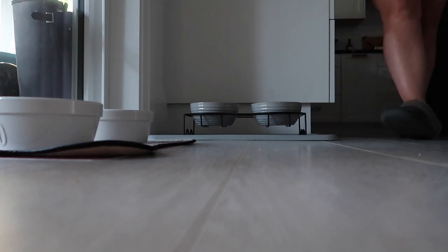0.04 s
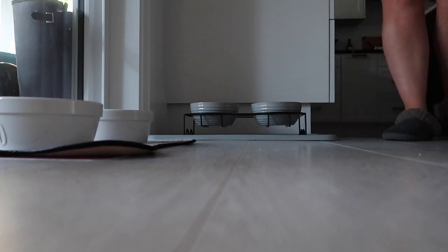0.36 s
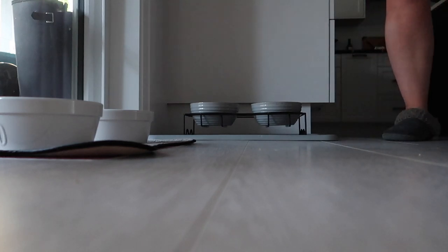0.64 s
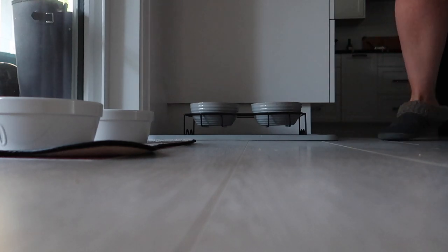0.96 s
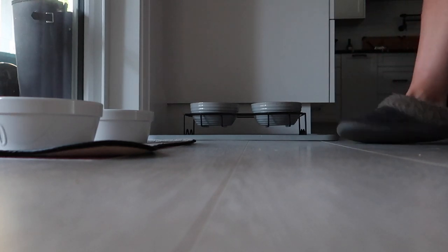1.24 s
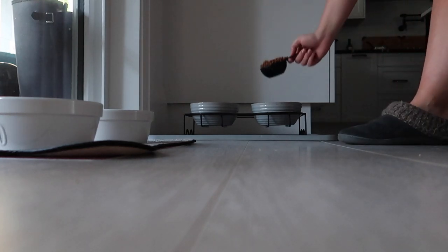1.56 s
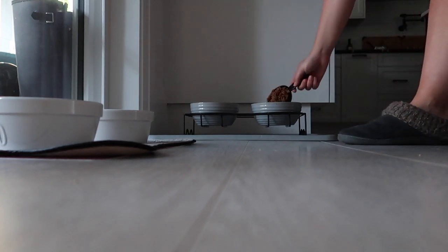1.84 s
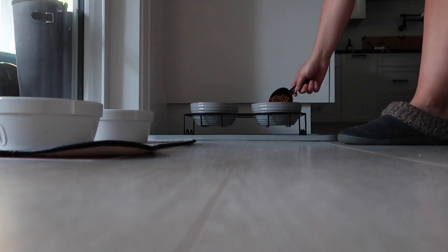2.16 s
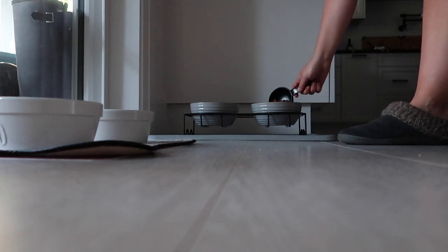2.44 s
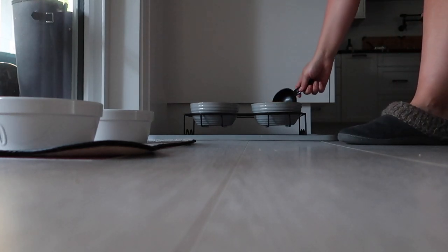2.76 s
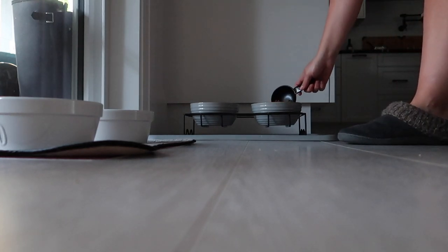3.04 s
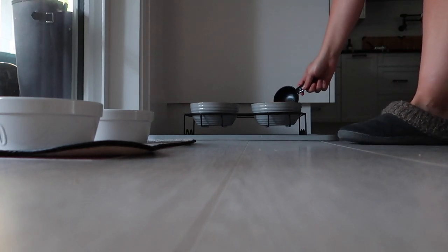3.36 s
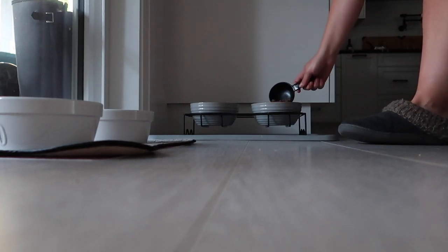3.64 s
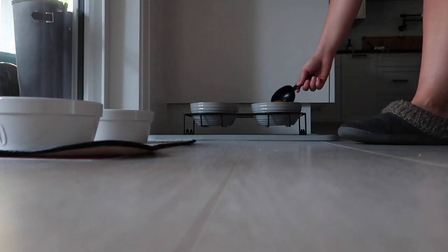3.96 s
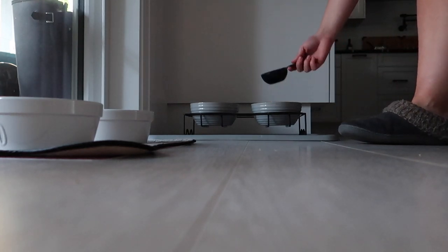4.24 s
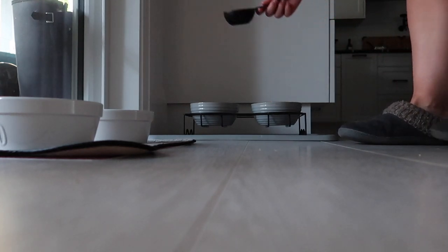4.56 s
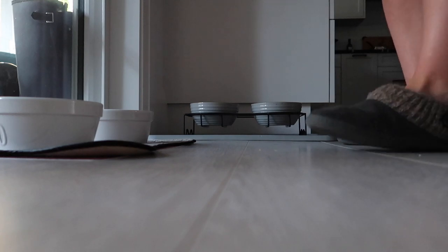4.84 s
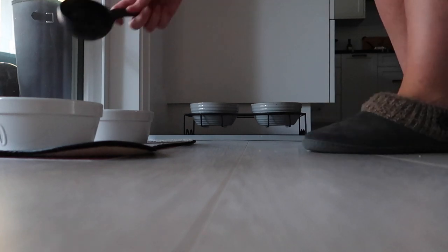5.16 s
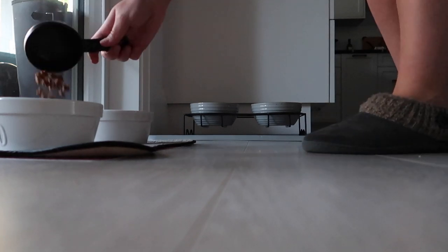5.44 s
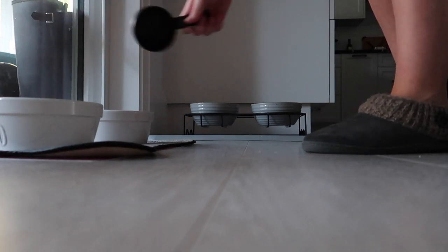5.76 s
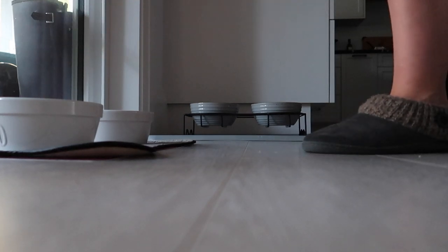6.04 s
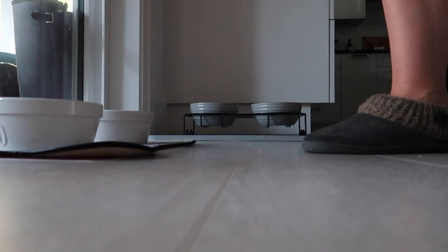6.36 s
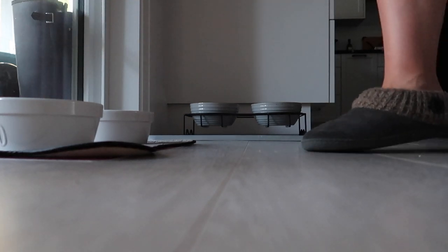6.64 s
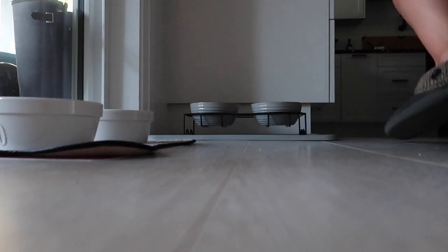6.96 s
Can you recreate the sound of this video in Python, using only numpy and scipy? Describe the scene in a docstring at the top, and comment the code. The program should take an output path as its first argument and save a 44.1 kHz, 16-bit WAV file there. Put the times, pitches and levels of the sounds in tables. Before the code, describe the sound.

Slippers shuffle on kitchen tile as kibble pours into a ceramic bowl, a scoop knocks, and more pellets clatter into a duller dish.

```python
"""Dry dog food pours from a plastic scoop into a ceramic bowl: pellets rattle on the glaze and ring
the wall until the heap damps it. The scoop knocks on the rim, last pieces tick in its cup, and a
shorter pour lands in a duller dish. Slippers slap and shuffle, clothes swish and joints crack as the
person bends and rises. A tiled kitchen reverberates, over room noise and appliance hum."""
import sys
import numpy as np
from scipy import signal
from scipy.fft import rfft, irfft, next_fast_len
from scipy.io import wavfile
from scipy.ndimage import uniform_filter1d

SR = 44100
rng = np.random.default_rng(int(sys.argv[2]) if len(sys.argv) > 2 else 0)


def unload_wav(signal):
    """Save mono or channel-first audio to the path in sys.argv[1] as 16-bit WAV at rate SR, clipped to [-1, 1]."""
    wavfile.write(
        sys.argv[1],
        SR,
        np.round(np.clip(np.atleast_2d(signal).T, -1, 1) * 32767).astype(np.int16),
    )


N = 317230
T = np.arange(N) / SR
SIDE = np.array([[1], [-1]])   # left plus, right minus

POUR_START_S, POUR_RISE_S, POUR_HOLD_S, POUR_DB = 1.913, 0.0097, 0.31, -37.5
PELLETS_PER_S, HEAP_AT_S, HEAP_BUILD_S = 850, 2.09, 0.021
def first_pour():
    """Kibble showers the bowl: the bulk stops fast, a trickle lingers, a shake frees the last pieces."""
    def pour(db, fall_db_per_s, hold_s=POUR_HOLD_S):
        return envelope(POUR_START_S, db, POUR_RISE_S, fall_db_per_s, hold_s)

    bulk = pour(POUR_DB, fall_db_per_s=80)
    trickle = pour(-42, fall_db_per_s=40)
    dribble = envelope(start_s=2.9, db=-56.5, rise_s=0.017, fall_db_per_s=70)
    flow = power_sum([bulk, trickle, dribble]) / from_db(POUR_DB)
    heap = .5 + .5 * np.tanh((T - HEAP_AT_S) / HEAP_BUILD_S)
    bare_glaze = pour(-36, fall_db_per_s=30.5, hold_s=0.091)   # first pellets click hardest
    rattle = pellet_rattle(flow) * np.hypot(bare_glaze, dribble)
    ring = bowl_ring(flow, heap)
    shimmer_gain = from_db(-5.5) * power_sum([bulk, pour(-42, fall_db_per_s=42), dribble])
    shimmer = kitchen(shimmer_gain * bowl_shimmer(heap), wet_db=-12, early_db=-15)
    shimmer += from_db(-4) * shimmer_gain * bowl_shimmer(heap) * SIDE
    return kitchen(rattle, wet_db=-8.5, early_db=-5.5) + shimmer + ring


# kibble on glaze: freq_hz, gain_db
RATTLE_SPECTRUM = [(300, -17), (700, 0), (930, 3), (1300, 0), (1800, -3), (2600, 0), (3300, 5.5),
                   (3650, 13.5), (4000, 19), (4350, 10), (4700, 10), (5300, -1), (6200, -3), (7000, 8),
                   (7700, 1), (8600, -1), (11000, 2.5), (13000, -3), (14300, -8)]
def pellet_rattle(flow):
    """Rough pellets hit the glaze, more often at higher flow."""
    shower = grains(per_s=PELLETS_PER_S * np.sqrt(flow), spread_db=3.9)
    impacts = through(shower, crunch(decay_s=0.0004))
    return evened(through(impacts, contact(RATTLE_SPECTRUM)), span_s=0.04)


# bowl wall modes: pitch_hz, relative_db
WALL_MODES = [(3884, -19), (3960, -8), (3976, -8), (4003, -4), (4023, 3), (4043, 2), (4162, -13),
              (4290, -21), (4325, -22)]
# clumps landing, levels relative: start_s, landing_s, wall_db, upper_db
CLUMP_HITS = [(1.916, 0.0064, -25, -53), (1.936, 0.0042, -20, -33), (1.966, 0.016, -26, -38),
              (1.987, 0.012, -20, -34.5), (2.012, 0.0042, -26, -35), (2.031, 0.0033, -25, -36),
              (2.049, 0.015, -19, -51), (2.084, 0.004, -25, -58), (2.093, 0.017, -19, -48),
              (2.145, 0.018, -23, -33), (2.183, .008, -27, -48), (2.202, 0.01, -21, -34),
              (2.217, 0.011, -32, -29.5), (2.235, 0.036, -27.5, -44), (2.284, 0.02, -28.5, -44),
              (2.314, 0.011, -30.5, -45), (2.347, 0.014, -62, -40.5), (2.42, .004, -50, -54),
              (2.447, .012, -47, -54), (2.494, 0.0036, -46, -65), (2.538, 0.005, -44, -51),
              (2.567, .006, -44, -49), (2.901, 0.0029, -49, -70), (2.917, 0.003, -43, -54),
              (2.948, .003, -56, -62), (3.129, 0.0017, -57, -81)]
# rim under first pellets, bulk and stragglers: start_s, relative_db, rise_s, fall_db_per_s, hold_s
RIM_SURGES = [(1.915, -56, .03, 75, .18), (2.09, -51.5, .04, 75, .15), (2.59, -58.5, .04, 100, .11)]
WALL_HZ, UPPER_HZ, RIM_HZ, HEAP_DAMPING_DB = 4025, 6905, 3090, 11
def bowl_ring(flow, heap):
    """Close wall modes beat; clumps swell the ring and the heap damps the stream's share of it."""
    def clumps(column):
        return power_sum(envelope(row[0], row[column], rise_s=0.004, fall_db_per_s=1300, hold_s=row[1])
                         for row in CLUMP_HITS)

    wall = evened(sum(from_db(db) * driven_mode(hz, t60_s=0.82) for hz, db in WALL_MODES), span_s=.007)
    wall = from_db(-1.2) * resonate(wall, WALL_HZ, width_hz=320)
    wall = wall + from_db(-15) * driven_mode(WALL_HZ, t60_s=.02) * SIDE
    upper = resonate(driven_mode(UPPER_HZ, t60_s=.08, span_s=.005), UPPER_HZ, width_hz=260)
    upper = upper + from_db(-9) * driven_mode(UPPER_HZ, t60_s=.04) * SIDE
    rim = resonate(driven_mode(RIM_HZ, t60_s=0.76, span_s=.04), RIM_HZ, width_hz=60)
    rim *= power_sum(envelope(*row) for row in RIM_SURGES)
    stream = flow ** 0.7 * from_db(POUR_DB - 3.5 - HEAP_DAMPING_DB * heap) * lumps(spread_db=3)
    ring = rim + np.hypot(clumps(column=2), stream) * wall + clumps(column=3) * upper
    return kitchen(ring, wet_db=-18, early_db=-22)


# other bowl modes: pitch_hz, relative_db, t60_s
SHIMMER_MODES = [(895, -12, 0.034), (1291, -15, 0.21), (6907, -2, .05), (6980, -7, 0.04), (9523, -7, 0.09),
                 (10385, -3, 0.2), (12020, -4, 0.06), (13447, -13, .05), (13800, -9, 0.055),
                 (14260, -14, .08)]
def bowl_shimmer(heap):
    """Modes fed by the fine rattle; the heap muffles the highest most."""
    modes = 0
    for hz, db, t60_s in SHIMMER_MODES:
        damping_db = 4.5 * heap * hz / 10000
        modes += from_db(db - damping_db) * resonate(driven_mode(hz, t60_s), hz, width_hz=400)
    return modes * lumps(spread_db=4.5)


# dish modes: pitch_hz, width_hz, relative_db
DISH_MODES = [(960, 130, -2), (2260, 60, 3), (2570, 90, 1), (2850, 130, -1), (3290, 70, -4), (3910, 60, -2),
              (4790, 150, 5), (5960, 100, 4), (6850, 70, -1), (8900, 110, -5), (10250, 90, -8)]
# kibble on the dish: freq_hz, gain_db
CRACKLE_SPECTRUM = [(300, -32), (950, -18), (1500, -14), (2300, 3), (3300, 6.5), (4200, -5), (4800, 6),
                    (7000, -3), (9000, 1), (13300, -7), (14200, -17)]
# leading pieces, mass, stragglers: start_s, relative_db, rise_s, fall_db_per_s
DISH_DROPS = [(5.463, -31.5, 0.0062, 1300), (5.477, -29.5, 0.0053, 190), (5.503, -39.5, .004, 170),
              (5.576, -43, 0.0023, 222)]
def second_pour():
    """A scoopful clatters into a heavy dish whose modes die fast."""
    shower = grains(per_s=900, spread_db=3.5)
    body = sum(from_db(db) * resonate(shower * rng.standard_normal(N), hz, width_hz)
               for hz, width_hz, db in DISH_MODES)
    crackle = through(shower + from_db(-2) * rng.standard_normal(N), contact(CRACKLE_SPECTRUM))
    pour = from_db(-1.5) * evened(body, span_s=0.0088) + from_db(-6) * evened(crackle, span_s=0.01)
    pour *= sum(envelope(*drop) for drop in DISH_DROPS)
    return kitchen(pour, wet_db=-9.5, early_db=-4.5) * from_db(.6 * SIDE)


# scoop on rim: start_s, relative_db
KNOCK_HITS = [(3.3622, -3.5), (3.3676, -19), (3.3735, -15.5)]
# clack: freq_hz, gain_db
KNOCK_SPECTRUM = [(150, -20), (450, -13), (800, -3), (1020, -13), (1330, 1.5), (1550, 2), (1820, 2),
                  (2150, -10.5), (2700, -12), (3500, -17.5), (4700, -27.5), (5400, -20), (5900, -20.5),
                  (7000, -27), (13000, -51)]
# bowl in its stand: pitch_hz, level_db, t60_s
STAND_MODES = [(1195, -41, .4), (1311, -31.5, .66), (1337, -32, .55), (1349, -30, .6), (1593, -36, .7),
               (1775, -36, .68), (1803, -35, .5), (1997, -39, .55)]
PING_START_S, PING_SHARP_HZ, PING_SETTLE_S = 3.382, 30, .025
def rim_knock():
    """The scoop clacks on the rim and crumbs jump; the rim pings, sharp until the scoop lifts clear."""
    hits = clicks(KNOCK_HITS)
    clack = through(hits, contact(KNOCK_SPECTRUM))
    clack -= 2 * resonate(clack, hz=1450, width_hz=1600)   # the bowl's wall takes a cycle to give
    crumbs = cup(through(hits, crunch(decay_s=0.0026)), tick_db=-17, ring_db=-5.5)
    first_hit = clicks([(KNOCK_HITS[0][0], 0)])
    body = through(first_hit, sum(from_db(db) * ringing(hz, t60_s) for hz, db, t60_s in STAND_MODES))
    pitch_hz = RIM_HZ + PING_SHARP_HZ * np.exp(-np.maximum(T - PING_START_S, 0) / PING_SETTLE_S)
    ping = np.sin(2 * np.pi * np.cumsum(pitch_hz) / SR)
    ping *= envelope(PING_START_S, db=-26.5, rise_s=.005, fall_db_per_s=92, hold_s=.03)
    ring = kitchen(body + ping, wet_db=-14, early_db=-20)
    knock = kitchen(clack, wet_db=-3.5, early_db=-4.5) + kitchen(crumbs, wet_db=2, early_db=-4)
    return knock * from_db(-.8 * SIDE) + ring * from_db(.5 * SIDE)


# single pieces, levels relative: start_s, cup_db, handle_db, tumble_s
SCOOP_TICKS = [(1.8817, -29.5, -42.5, .004), (1.905, -23.5, -50, 0.0023), (2.496, -27.5, -47.5, 0.016),
               (2.636, -28.5, -51, 0.0089), (2.683, -26, -49, 0.0097), (2.7418, -29.5, -51, 0.0081),
               (2.822, -28.5, -40.5, 0.0064), (2.929, -32, -55, 0.0031), (3.267, -35, -59, 0.0017),
               (3.7603, -29, -49, 0.00063), (4.0234, -33, -45.5, 0.0015), (4.035, -43, -61, 0.0058),
               (5.4032, -32.5, -47, 0.0023)]
# crumbs in the tilted scoop: start_s, relative_db, rise_s, fall_db_per_s
CRUMB_SLIDES = [(4.035, -43, 0.057, 92), (5.28, -46.5, 0.078, 41)]
def scoop():
    """Last pieces slide, tick and bounce in the plastic scoop."""
    slide = evened(cup(grains(per_s=780, spread_db=6), ring_db=9), span_s=0.041)
    slide *= from_db(-13.5) * sum(envelope(*row) for row in CRUMB_SLIDES)
    tumbles = sum(through(clicks([(start_s, db)]), crunch(tumble_s))
                  for start_s, db, _, tumble_s in SCOOP_TICKS)
    ticks = from_db(-1.5) * cup(tumbles, ring_db=8)
    handle = from_db(6.5) * through(clicks(SCOOP_TICKS, column=2), ringing(hz=1710, t60_s=0.0065))
    pieces = kitchen(slide + ticks + handle, wet_db=0, early_db=-1)
    return pieces + kitchen(clinks(), wet_db=-6, early_db=-7)


# kibble on plastic: freq_hz, gain_db
TICK_SPECTRUM = [(1000, -22), (3600, -2.5), (4500, -4), (5100, -1.5), (5800, 1), (6500, -6.5), (7200, 2),
                 (9000, -8.5), (11000, -11), (12400, -17), (13500, -32)]
# scoop cup modes: pitch_hz, width_hz, relative_db
CUP_MODES = [(4460, 100, 3), (5820, 130, 5.5), (7230, 200, -5), (12400, 250, -13)]
def cup(touches, ring_db, tick_db=0):
    """Each touch gives a dry tick and a short ring of the cup."""
    ring = sum(from_db(db) * resonate(touches, hz, width_hz) for hz, width_hz, db in CUP_MODES)
    return from_db(tick_db) * through(touches, contact(TICK_SPECTRUM)) + from_db(ring_db) * ring


# bounces in the cup: start_s, mode1_db, mode2_db, mode3_db, mode4_db
BOUNCES = [(4.099, -44, -35, -47, -64), (4.1095, -43, -38, -45, -60), (4.114, -37, -41, -50, -60),
           (4.124, -42, -39, -49, -60), (4.134, -47, -43, -52, -62), (4.147, -43, -47, -52, -60),
           (4.157, -41, -50, -55, -60), (4.169, -42, -52, -56, -62), (4.177, -43.5, -46, -55, -64),
           (4.238, -40.5, -48, -49, -46), (4.248, -37, -51, -56, -46), (4.265, -46, -56, -58, -56)]
def clinks():
    """A loose piece bounces, striking each cup mode with its own strength."""
    out = np.zeros(N)
    for start_s, *mode_dbs in BOUNCES:
        for (hz, width_hz, _), db in zip(CUP_MODES, mode_dbs):
            ring = resonate(crunch(decay_s=0.0016), hz, width_hz)
            add_hit(out, resonate(ring, hz, width_hz=2200), start_s, db)
    return out


# slipper on tile, levels relative: start_s, slap_db, thud_db, tap_db, pat_db
FOOTFALLS = [(0.098, -32.5, -56.5, -34, -50), (0.169, -36.5, -64, -33.5, -55), (0.182, -51, -72, -53, -62),
             (0.725, -34, -48.5, -37.5, -44), (0.893, -41, -56, -50, -56),
             (1.291, -14.5, -45.5, -28.5, -25.5), (1.316, -24.5, -60, -50, -30),
             (1.366, -46, -77, -37, -42), (4.794, -37, -47, -40, -42), (4.909, -41, -52.5, -39.5, -54),
             (6.349, -30.5, -46, -29, -26), (6.95, -62, -60, -42.5, -63)]
# sole slap: freq_hz, gain_db
SLAP_SPECTRUM = [(30, -45), (80, -33), (160, -5), (260, 3), (360, 5.5), (440, 0.5), (540, 2), (780, -32.5),
                 (1500, -43), (4000, -38), (13000, -86)]
# sole tap: freq_hz, gain_db
TAP_SPECTRUM = [(100, -30), (400, 1), (650, 17), (900, 12.5), (1400, 7.5), (1900, 0.5), (2500, 0),
                (3300, -4), (5000, -14.5), (12000, -32)]
def footsteps():
    """The heel thuds; the soft sole slaps, taps and pats the air out from under it."""
    slap = from_db(2) * through(clicks(FOOTFALLS), contact(SLAP_SPECTRUM))
    heel = resonate(ringing(hz=107.5, t60_s=0.042), hz=107, width_hz=105)
    thud = from_db(22) * through(clicks(FOOTFALLS, column=2), heel)
    tap = from_db(2.5) * through(clicks(FOOTFALLS, column=3), contact(TAP_SPECTRUM))
    pat = through(clicks(FOOTFALLS, column=4), ringing(hz=295, t60_s=0.08))
    low = kitchen(thud + pat, wet_db=-5, early_db=-8)
    return low + kitchen(slap, wet_db=0.5, early_db=-1.5) + kitchen(tap, wet_db=-1, early_db=-1.5)


# joint cracks: start_s, level_db, pitch_hz, width_hz, upper_hz, upper_db, pop_db
JOINT_CRACKS = [(1.5237, -19, 2010, 328, 3770, 2.5, 2.5), (1.527, -26, 2380, 260, 3600, 1, -18),
                (1.533, -39, 2310, 400, 3620, -4.5, 5), (5.2216, -25.5, 1680, 363, 2380, -47, -16),
                (5.8746, -22, 1990, 516, 4200, -15, -9), (5.887, -33.5, 2140, 350, 3960, -7, -28)]
def joints():
    """Each crack is one snap through two broad resonances plus a dull pop, muffled by flesh."""
    flesh = signal.butter(2, 5000, fs=SR, output="sos")
    snap = signal.unit_impulse(SR // 20)
    out = np.zeros(N)
    for start_s, db, hz, width_hz, upper_hz, upper_db, pop_db in JOINT_CRACKS:
        body = resonate(resonate(snap, hz, width_hz), hz, width_hz * 1.5)
        upper = resonate(resonate(snap, upper_hz, width_hz=320), upper_hz, width_hz=480)
        pop = resonate(resonate(snap, hz=820, width_hz=990), hz=1000, width_hz=8800)
        crack = signal.sosfilt(flesh, body + from_db(upper_db) * upper + from_db(pop_db) * pop)
        add_hit(out, crack, start_s, db)
    return kitchen(out, wet_db=2.5, early_db=-5) * from_db(-.6 * SIDE)


# slipper slides: start_s, length_s, relative_db
RUB_STROKES = [(0.05, 0.34, -55), (0.72, 0.34, -55), (1.15, 0.62, -50.5), (4.42, 0.68, -50),
               (6.1, 0.775, -53), (6.92, 0.28, -54)]
# felt on tile: freq_hz, gain_db
RUB_SPECTRUM = [(150, -2.5), (400, 7.5), (800, 4.5), (1500, 0.5), (2800, -5), (5000, -10.5), (9000, -19),
                (14000, -75)]
# limb swings: start_s, length_s, relative_db
CLOTH_STROKES = [(0.76, 0.16, -66), (0.96, 0.12, -60), (1.15, 0.6, -65.5)]
# cloth: freq_hz, gain_db
CLOTH_SPECTRUM = [(1000, -18), (2500, 7), (5000, 2.5), (11000, -9), (14000, -34)]
def shuffle():
    """Felt slippers and clothes rub in a fine grain."""
    rub = rms_one(through(grains(per_s=900, spread_db=5), contact(RUB_SPECTRUM)))
    rub *= from_db(-6.5) * strokes(RUB_STROKES, fullness=4.4)
    swish = rms_one(through(grains(per_s=4400, spread_db=6), contact(CLOTH_SPECTRUM)))
    swish *= from_db(2) * strokes(CLOTH_STROKES, fullness=1)
    return kitchen(rub + swish, wet_db=1, early_db=-2.5)


# room noise: freq_hz, gain_db
AIR_SPECTRUM = [(20, -42), (31, -16), (48, -1), (70, -7.5), (105, -1.5), (170, -5), (280, -6.5), (500, -10),
                (850, -14), (1300, -19.5), (2500, -23.5), (4900, -29), (9300, -35.5), (11800, -37),
                (14000, -47)]
# room noise width: freq_hz, side_minus_mid_db
AIR_WIDTH = [(50, -22), (110, -15.5), (200, -3), (400, -4), (2400, -2), (8000, 0), (14000, -33)]
# appliance hum: pitch_hz, level_db
HUM_TONES = [(48, -83), (281, -63), (338, -70.5)]
# mains tone: time_s, level_db
MAINS_LEVEL = [(0, -59), (2, -63.5), (6.5, -56.5), (7.2, -48.5)]
def ambience():
    """Steady room noise, appliance hum and a mains tone that swells late."""
    noise, freq_hz = diffuse(AIR_WIDTH, next_fast_len(N, True) * 2)
    air = rms_one(irfft(noise * from_db(at_hz(AIR_SPECTRUM, freq_hz)))[:, :N])
    hum = sum(from_db(db) * rms_one(resonate(rng.standard_normal(N), hz, width_hz=8.8))
              for hz, db in HUM_TONES)
    mains = evened(resonate(rng.standard_normal(N), hz=101.1, width_hz=5), span_s=0.24)
    mains *= from_db(np.interp(T, *np.transpose(MAINS_LEVEL)))
    return from_db(-49.5) * air + hum + mains


# reverb decay: freq_hz, t60_s
REVERB_DECAY = [(100, 0.78), (400, 0.39), (1500, 0.55), (4000, 0.69), (8000, 0.63), (14000, 0.34)]
# reverb width: freq_hz, side_minus_mid_db
REVERB_WIDTH = [(50, -40), (130, -31), (300, -28), (1300, -12.5), (2500, -13), (4400, -4.5), (8000, -5),
                (14000, -19)]
def kitchen(x, wet_db, early_db, early_s=0.015, gap_s=0.0014, size=32768):
    """Direct sound, dense reflections off floor and cupboards, and a tail that dies band by band."""
    noise, hz = diffuse(REVERB_WIDTH, size)
    centres_hz, t60s_s = np.transpose(REVERB_DECAY)
    t, tail = T[:size], 0
    for share, t60_s in zip(np.eye(len(centres_hz)), t60s_s):
        band = at_hz(np.c_[centres_hz, share], hz)
        tail += irfft(noise * band) * from_db(-60 * t / t60_s)
    early = irfft(diffuse(REVERB_WIDTH, size)[0]) * np.exp(-t / early_s)
    arrived = np.clip(t / gap_s - 1, 0, 1)
    response = from_db(wet_db) * rms_one(tail * arrived) + from_db(early_db) * rms_one(early * arrived)
    response /= np.sqrt(size)
    return x + np.array([through(feed, ir) for feed, ir in zip(np.broadcast_to(x, (2, N)), response)])


def diffuse(width, size):
    """Left and right spectra of noise from all sides, and their frequencies."""
    hz = np.fft.rfftfreq(size, 1 / SR)
    mid, side = rfft(rng.standard_normal((2, size)))
    share = from_db(at_hz(width, hz))
    return (mid + share * side * SIDE) / np.sqrt(1 + share ** 2), hz


def grains(per_s, spread_db):
    """Random collisions of uneven force."""
    force = from_db(spread_db * np.minimum(rng.exponential(1, N), 4))
    return (rng.random(N) < per_s / SR) * force * rng.choice([-1, 1], N)


def crunch(decay_s, size=1024):
    """Rough contact: a burst of tiny impacts, unit energy."""
    burst = rng.standard_normal(size) * np.exp(-T[:size] / decay_s)
    return rms_one(burst) / np.sqrt(size)


def contact(spectrum, size=4096):
    """Minimum-phase pulse with this spectrum, peak 1."""
    gain = from_db(at_hz(spectrum, np.fft.rfftfreq(size, 1 / SR)))
    cepstrum = irfft(np.log(gain))
    cepstrum[1:size // 2] *= 2
    cepstrum[size // 2 + 1:] = 0
    pulse = irfft(np.exp(rfft(cepstrum)))
    return pulse / np.abs(pulse).max()


def driven_mode(hz, t60_s, span_s=0.15):
    """One mode kept ringing by noise."""
    width_hz = np.log(1000) / (np.pi * t60_s)
    return evened(resonate(rng.standard_normal(N), hz, width_hz), span_s)


def ringing(hz, t60_s, size=44100):
    """Decaying sine."""
    return np.sin(2 * np.pi * hz * T[:size]) * from_db(-60 * T[:size] / t60_s)


def resonate(x, hz, width_hz):
    """Two-pole resonance, peak gain 1."""
    r = np.exp(-np.pi * width_hz / SR)
    feedback = [1, -2 * r * np.cos(2 * np.pi * hz / SR), r * r]
    return signal.lfilter(np.array([1, 0, -1]) * (1 - r * r) / 2, feedback, x)


def envelope(start_s, db, rise_s, fall_db_per_s, hold_s=0):
    """Rise, hold, steady fall."""
    age_s = T - start_s
    fall_db = fall_db_per_s * np.maximum(age_s - rise_s - hold_s, 0)
    return np.clip(age_s / rise_s, 0, 1) * from_db(db - fall_db)


def strokes(rows, fullness):
    """One arc of gain per movement; more fullness squares its shoulders."""
    out = np.zeros(N)
    for start_s, length_s, db in rows:
        arc = np.sin(np.pi * np.clip((T - start_s) / length_s, 0, 1))
        out += from_db(db) * np.maximum(arc, 0) ** (1 / fullness)
    return out


def lumps(spread_db, per_s=45):
    """Gain that wanders as pieces bunch up and thin out."""
    knots = rng.standard_normal(int(N / SR * per_s) + 2)
    wander = np.interp(T * per_s, np.arange(len(knots)), knots)
    return from_db(spread_db * np.clip(wander, -2, 1))


def evened(x, span_s):
    """Hold the slow level at rms 1, keep the quick grain."""
    size = int(span_s * SR)
    power = uniform_filter1d(uniform_filter1d(x ** 2, size), size)
    return x / np.sqrt(np.maximum(power, 0) + 1e-12)


def clicks(rows, column=1):
    """One impulse per row, at the level in the given column."""
    rows, out = np.array(rows), np.zeros(N)
    out[np.round(rows[:, 0] * SR).astype(int)] = from_db(rows[:, column])
    return out


def add_hit(out, hit, start_s, peak_db):
    out[int(start_s * SR):][:len(hit)] += from_db(peak_db) * hit / np.abs(hit).max()


def through(x, response):
    return signal.oaconvolve(x, response)[:N]


def at_hz(points, hz):
    """Interpolate a table over log frequency."""
    freq_hz, value = np.transpose(points)
    return np.interp(np.log(np.maximum(hz, 1)), np.log(freq_hz), value)


def power_sum(gains):
    return np.sqrt(sum(gain ** 2 for gain in gains))


def rms_one(x):
    return x / np.sqrt(np.mean(x ** 2) + 1e-20)


def from_db(db):
    return 10 ** (np.asarray(db) / 20)


def scene():
    """Person, kibble and room, in stereo."""
    person = footsteps() + shuffle() + joints()
    kibble = first_pour() + scoop() + rim_knock() + second_pour()
    return person + kibble + ambience()


# between the two microphone ports: freq_hz, phase_rad
MIC_PHASE = [(4200, 0), (6000, .8), (8600, 1.6), (14000, 1.9)]
CUTOFF_HZ = 14400
def record(dry):
    """The ports part in phase toward the treble; a steep low-pass cuts the top."""
    size = next_fast_len(N + SR // 10, True)
    phase_rad = at_hz(MIC_PHASE, np.fft.rfftfreq(size, 1 / SR))
    ports = irfft(rfft(dry, size) * np.exp(.5j * phase_rad * SIDE), size)[:, :N]
    return signal.sosfilt(signal.ellip(10, .2, 80, CUTOFF_HZ, fs=SR, output="sos"), ports)


dry = scene()
out = record(dry)
unload_wav(out)
```